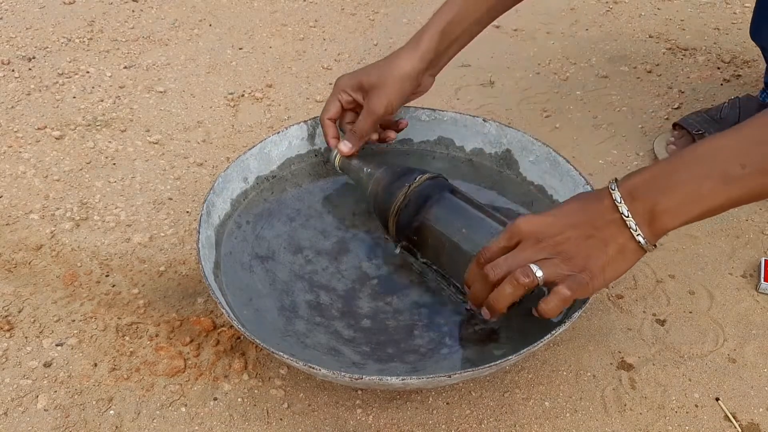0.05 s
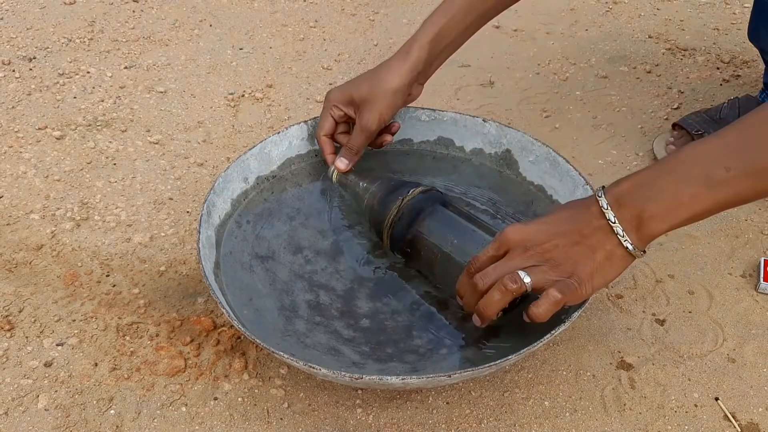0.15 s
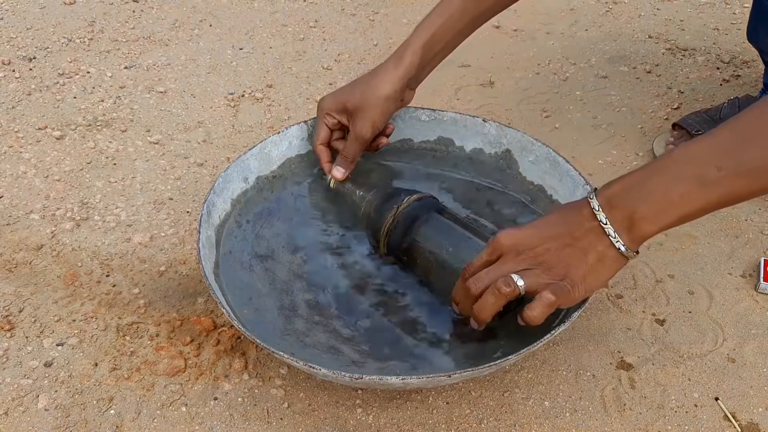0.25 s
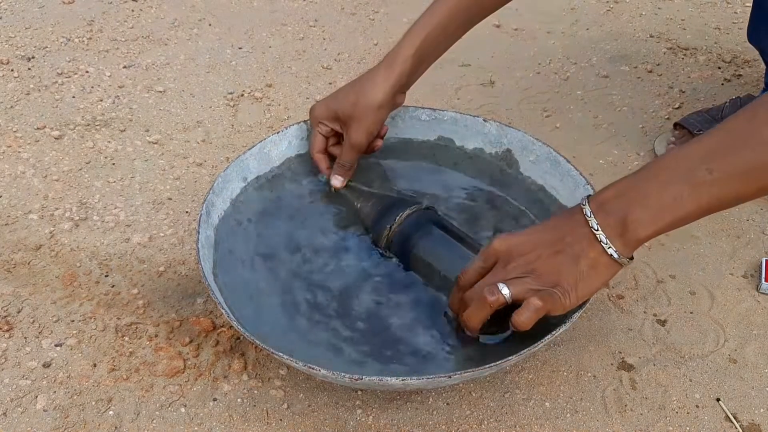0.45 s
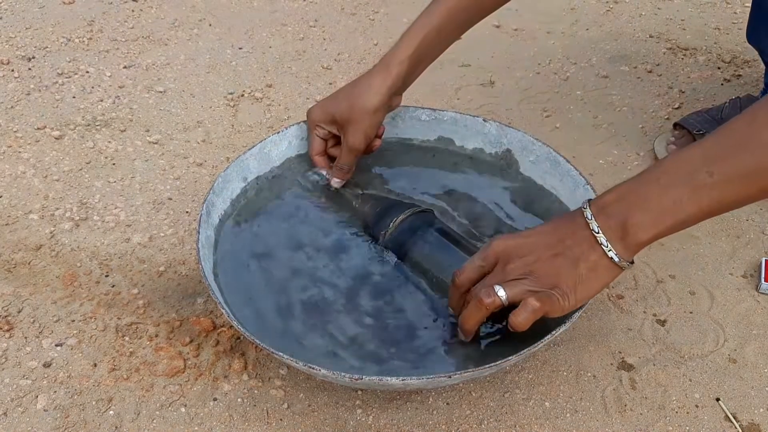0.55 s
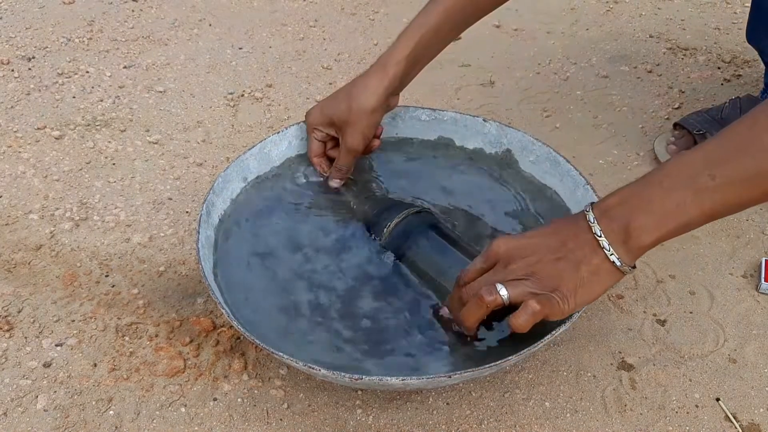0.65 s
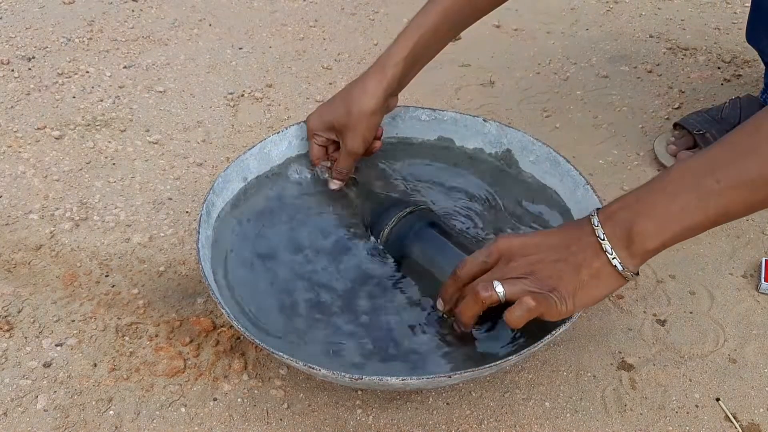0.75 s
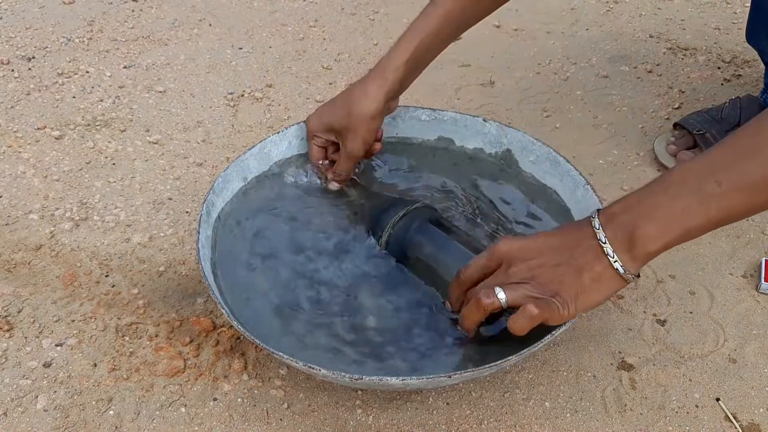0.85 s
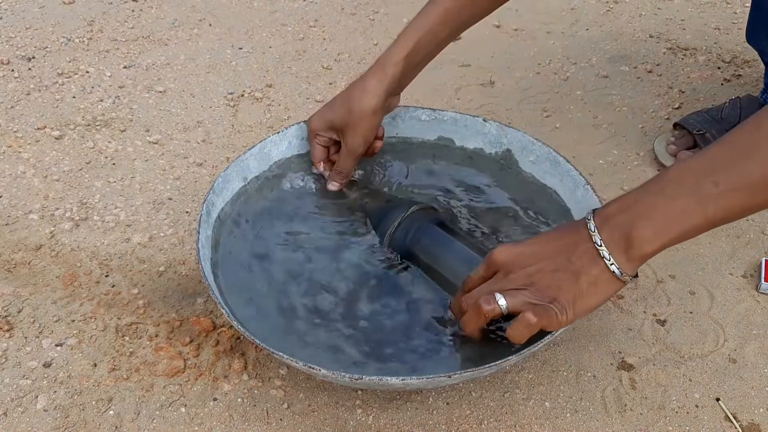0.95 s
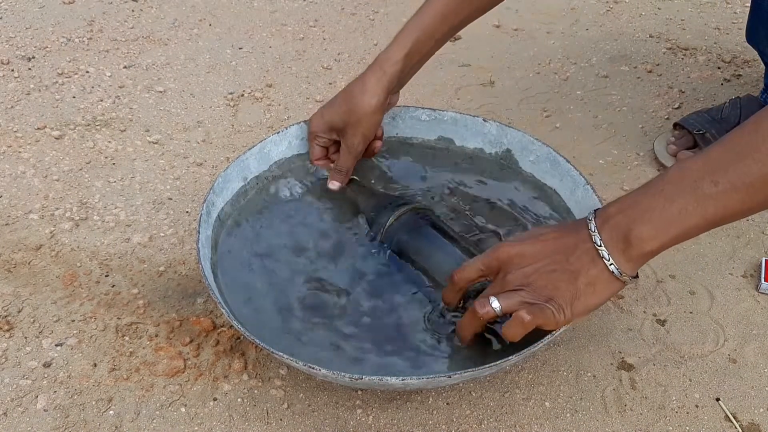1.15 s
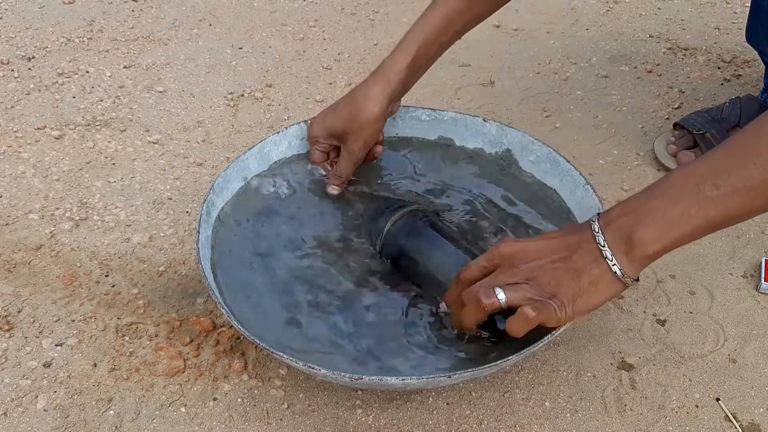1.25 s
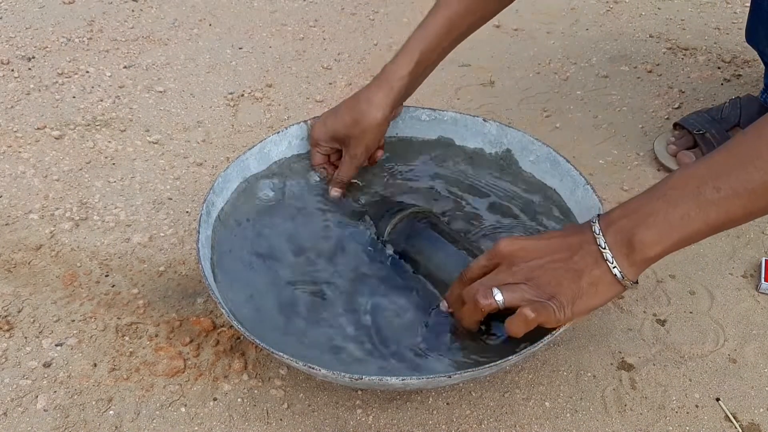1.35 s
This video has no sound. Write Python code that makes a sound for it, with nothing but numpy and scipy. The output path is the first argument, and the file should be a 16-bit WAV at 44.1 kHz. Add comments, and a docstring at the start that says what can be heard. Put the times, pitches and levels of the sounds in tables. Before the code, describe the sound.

Glass cracks with two sharp, ringing snaps as a bottle dips into water outdoors, then splits with a gulp. Small glassy ticks, splashes and bubbles follow over a faint sizzle, with low wind rumble on the microphone.

```python
"""Outdoors, at a metal basin of water. A heated glass bottle is lowered in; thermal stress cracks it
twice, then splits it, and each fracture rings the modes of the wall. Trapped air resonates in a gulp.
Water runs in with splashes, ringing bubbles and a sizzling wash, the broken edges tick, and the
bottle's cavity sings faintly. A breeze buffets the microphone, mostly its right port."""
import sys
import numpy as np
from scipy import signal
from scipy.fft import rfft, irfft, next_fast_len
from scipy.io import wavfile
from scipy.ndimage import map_coordinates

SR = 44100
rng = np.random.default_rng(int(sys.argv[2]) if len(sys.argv) > 2 else 0)


def wav_record(signal):
    """Record a signal, one row per channel, as 16-bit PCM in the file named by sys.argv[1]."""
    frames = np.transpose(np.atleast_2d(signal))
    bounded = np.clip(frames, -1, 1)
    # unit amplitude maps onto the largest positive 16-bit level
    quanta = np.round(bounded * 32767).astype(np.int16)
    wavfile.write(sys.argv[1], SR, quanta)


N = 61739

# fractures: start_s, ring_db, ring_time_share, snap_db, snap_t60_s, left_minus_right_db, thud_db
CRACKS = [(.2142, -13.5, 0.52, -19.5, 0.016, 2.5, -63), (.3150, -20, 1, -16.5, 0.011, 4, -72),
          (.5179, -10, 1, -21, 0.0044, 0, -18)]
# spectrum of a small glass impact: frequency_hz, level_db
TICK_SPECTRUM = [(600, -12.5), (1500, -1.5), (4500, 3.5), (6500, 0), (8500, -13), (11500, -4),
                 (16000, -13.5)]


def amp(db):
    """Decibels to amplitude ratio."""
    return 10 ** (np.asarray(db) / 20)


def unit(x):
    """Normalisation to rms 1."""
    return x / np.sqrt(np.mean(x ** 2) + 1e-20)


def along(points, hz):
    """Interpolation of (frequency_hz, value) points on a logarithmic frequency axis."""
    frequencies, values = np.transpose(points)
    return np.interp(np.log(hz + 1), np.log(frequencies + 1), values)


def level(points):
    """Amplitude envelope through (time_s, level_db) points."""
    return amp(np.interp(np.arange(N) / SR, *np.transpose(points)))


def since(start_s):
    """Seconds elapsed since an onset, zero before it."""
    return np.maximum(np.arange(N) / SR - start_s, 0)


def fade(t, rise_s, t60_s):
    """Damped envelope: a quick rise, then exponential decay."""
    return (1 - np.exp(-t / rise_s)) * amp(-60 * t / t60_s)


def swell(centre_s, half_s):
    """Gaussian envelope, down to 1/e at half_s from its centre."""
    return np.exp(-((np.arange(N) / SR - centre_s) / half_s) ** 2)


def wobble(rate_hz):
    """Smooth random modulation with rate_hz knots a second."""
    return map_coordinates(rng.standard_normal(1024), [np.arange(N) * rate_hz / SR], mode="wrap")


def filtered(x, response):
    """Linear filtering: the spectrum of x times a frequency response."""
    size = next_fast_len(N + SR // 2)
    return irfft(rfft(x, size) * response(np.fft.rfftfreq(size, 1 / SR)), size)[..., :N]


def coloured(x, spectrum):
    """Spectral shaping by (frequency_hz, level_db) points, at rms 1."""
    return unit(filtered(x, lambda hz: amp(along(spectrum, hz))))


def spread(pair, correlation):
    """Mid-side mixing gives two independent signals a left-right correlation."""
    angle = np.arccos(correlation) / 2
    mid, side = np.cos(angle) * pair[0], np.sin(angle) * pair[1]
    return np.array([mid + side, mid - side])


def hiss(spectrum, correlation):
    """Coloured Gaussian noise in stereo."""
    return spread(coloured(rng.standard_normal((2, N)), spectrum), correlation)


def fizz(spectrum, correlation, rate_hz=2500, scatter_db=3.5, pop_share=0.64):
    """Shot noise: dense tiny pops of uneven size on a Gaussian bed."""
    pops = (rng.random((2, N)) < rate_hz / SR) * rng.standard_normal((2, N))
    pops *= amp(scatter_db * rng.standard_normal((2, N)))
    bed = np.sqrt(1 - pop_share) * rng.standard_normal((2, N))
    return spread(coloured(np.sqrt(pop_share) * unit(pops) + bed, spectrum), correlation)


def echo(x, t60_s):
    """Diffuse reverberation: convolution with decaying noise, different in each channel."""
    tail = rng.standard_normal((2, N)) * fade(since(0), .001, t60_s)
    return signal.fftconvolve(x, tail / np.linalg.norm(tail[0]), axes=1)[:, :N]


def still_air():
    """Ambient noise floor: faint, steady and strongest at low frequencies."""
    # outdoor air: frequency_hz, level_db
    spectrum = [(400, 0), (1500, -20), (16000, -22)]
    return amp(-67) * hiss(spectrum, correlation=0.39)


def wind():
    """Turbulent pressure buffets each port independently; single eddies push on the right one."""
    # buffeting at each port: time_s, level_db
    left_port = [(.74, -58), (.81, -36.5), (.86, -46.5), (1.4, -63)]
    right_port = [(.08, -54), (.17, -35.5), (.35, -46), (.6, -34.5), (.8, -39.5), (1.1, -37.5),
                  (1.4, -44.5)]
    # turbulence: frequency_hz, level_db
    spectrum = [(20, -37), (45, -7.5), (80, 1.5), (140, -1), (220, -10.5), (330, -23.5), (2000, -94)]
    # eddy strikes: time_s, peak_db
    eddies = [(0.164, -22), (0.244, -23), (.29, -24.5), (0.384, -30), (0.424, -27.5), (0.48, -23.5),
              (0.598, -23), (0.628, -23), (0.692, -25), (0.732, -21), (0.936, -20.5), (1.054, -20.5),
              (1.301, -25.5)]
    left = level(left_port) * coloured(rng.standard_normal(N), spectrum)
    right = level(right_port) * coloured(rng.standard_normal(N), spectrum)
    for time_s, peak_db in eddies:
        push = unit(signal.unit_impulse(N, round(time_s * SR)))
        turbulence = unit(swell(time_s, half_s=0.01) * rng.standard_normal(N))
        eddy = coloured(turbulence - push, spectrum)
        right += amp(peak_db) * eddy / np.abs(eddy).max()
    return np.array([left, right])


def hollow():
    """Cavity resonance: narrow noise bands of the bottle's air swell and glide as it dips and fills."""
    # air modes: centre_s, half_length_s, pitch_hz, level_db, width_hz, glide_hz_per_s
    resonances = [(0.35, 0.11, 1930, -43.5, 190, -900), (0.455, 0.057, 1815, -42, 90, 0),
                  (0.432, 0.1, 875, -48.5, 150, 200), (0.66, 0.12, 2005, -40.5, 35, -2),
                  (1.02, .085, 1815, -40, 70, -400), (1.236, 0.026, 1002, -45, 20, 0)]
    t, tones = np.arange(N) / SR, np.zeros(N)
    for centre_s, half_s, hz, db, width_hz, glide in resonances:
        phase = 2 * np.pi * (hz * t + glide * (t - centre_s) ** 2 / 2)
        band = unit(wobble(width_hz) * np.sin(phase) + wobble(width_hz) * np.cos(phase))
        tones += amp(db) * swell(centre_s, half_s) * band / np.sqrt(2)
    first_crack_s = CRACKS[0][0]
    return tones * (t > first_crack_s) / np.sqrt(2)


def water():
    """Incoherent sources add in power: a sizzling wash, splashes, their spray and a lower churning."""
    # splashes: start_s, level_db, t60_s, spray_db
    splashes = [(0.522, -28, 0.2, -55), (0.5977, -24.5, 0.06, -48), (0.669, -26.5, 0.15, -24),
                (0.706, -29, 0.046, -52), (0.9026, -52, 0.053, -23.5), (0.946, -26, 0.055, -58),
                (1.041, -28.5, 0.066, -29.5), (1.096, -34.5, 0.08, -25), (1.193, -37, 0.08, -62)]
    # envelopes of the flow: time_s, level_db
    wash_levels = [(.21, -59.5), (.22, -47), (.55, -45.5), (.72, -43), (.8, -45), (.95, -39.5), (1.02, -47),
                   (1.25, -45), (1.4, -47)]
    churn_levels = [(.21, -101), (.22, -51), (.51, -42.5), (.55, -33), (.68, -44), (.8, -50), (.89, -46.5),
                    (.96, -41), (1.1, -39.5), (1.27, -49.5)]
    # spectra of the flow: frequency_hz, level_db
    wash_spectrum = [(450, -9), (1100, -8), (2000, -12.5), (2700, -4), (4300, 2), (6500, -3), (8600, -17),
                     (11500, -9), (15500, -10)]
    spray_spectrum = [(1500, -4), (6000, 3.5), (9000, -8), (12000, 3)]
    churn_spectrum = [(400, -29), (750, -14), (1150, 0), (1450, -2), (1750, 2), (2150, -1.5), (2600, -13),
                      (4000, -26)]
    splash_gain, spray_gain = np.zeros((2, N))
    for start_s, db, t60_s, spray_db in splashes:
        splash_gain += amp(db) * fade(since(start_s), rise_s=0.00027, t60_s=t60_s)
        spray_gain += amp(spray_db) * fade(since(start_s), rise_s=0.00017, t60_s=0.036)
    wash = np.hypot(level(wash_levels), splash_gain) * fizz(wash_spectrum, correlation=0.39)
    spray = spray_gain * fizz(spray_spectrum, correlation=0.39)
    churn = level(churn_levels) * fizz(churn_spectrum, correlation=0.36)
    return wash + spray + churn


def bubbles(jitter_rad=0.64, glide_per_t60=0.063):
    """Each bubble is a damped oscillator, unsteady in the moving water and rising a little in pitch."""
    # bubble pulsations: start_s, pitch_hz, level_db, t60_s
    pulsations = [(0.6, 1047, -24, 0.08), (0.678, 1164, -23, 0.045), (0.753, 398, -35.5, 0.03),
                  (0.907, 1280, -31.5, 0.044), (0.95, 1270, -19, 0.018), (0.955, 1088, -29.5, 0.077),
                  (1.006, 926, -28.5, 0.027), (1.043, 1036, -22, 0.058), (1.096, 1004, -28.5, 0.032),
                  (1.194, 1106, -35.5, 0.056), (1.3079, 2515, -15, 0.011)]
    out = np.zeros(N)
    for start_s, hz, db, t60_s in pulsations:
        t = since(start_s)
        phase = 2 * np.pi * hz * t * (1 + glide_per_t60 * t / t60_s / 2)
        phase += jitter_rad * wobble(rate_hz=195.6)
        out += amp(db) * fade(t, rise_s=0.0005, t60_s=t60_s) * np.sin(phase)
    return out


def crackle(rate_hz=170):
    """Specks of glass settle as sparse random impulses, loudest a little after the split."""
    specks = (rng.random(N) < rate_hz / SR) * rng.standard_normal(N)
    return amp(-44.5) * swell(centre_s=0.7, half_s=0.09) * coloured(specks, TICK_SPECTRUM)


def ticks(grit=0.55):
    """Brief contact is broadband: the broken edges give a sharp pulse, then a trace of scraping."""
    # edge contacts: start_s, peak_db
    contacts = [(.3857, -24), (.5864, -14), (.5972, -13), (.6084, -9), (.6091, -11), (.623, -15),
                (.6389, -15.5), (.6631, -17.5), (.6756, -12), (.6912, -5.5), (.6994, -15), (.7068, -17),
                (.7375, -13), (.7502, -12.5), (.7655, -22), (.8181, -10.5), (.8584, -19), (.8712, -21),
                (.8788, -17.5)]
    out = np.zeros((2, N))
    for start_s, peak_db in contacts:
        scrape = grit * fade(since(start_s), rise_s=1 / SR, t60_s=0.0019) * rng.standard_normal((2, N))
        pulse = signal.unit_impulse(N, round(start_s * SR))
        tick = coloured(scrape - pulse, TICK_SPECTRUM)
        out += amp(peak_db) * tick / np.abs(tick).max()
    return out


def gulp(start_s=.5183, jitter_rad=.3):
    """Water bursts through the split; the trapped air acts as a spring and rings unsteadily."""
    # trapped-air modes: pitch_hz, relative_db, t60_s
    modes = [(765, -13, 0.071), (1056, 2, 0.065), (1141, 1, 0.099), (1306, 3, 0.063), (1414, -13, 0.17),
             (1642, -14, 0.12), (1747, -14, 0.14), (2235, -24, 0.26)]
    t, out = since(start_s), np.zeros(N)
    for hz, db, t60_s in modes:
        phase = 2 * np.pi * hz * t + jitter_rad * wobble(rate_hz=195.6)
        out += amp(db) * fade(t, rise_s=0.0034, t60_s=t60_s) * np.sin(phase)
    return amp(-9.5) * out


def driven(start_s, t60_s, rise_s=0.00059, run_s=0.0012):
    """Forced, then free vibration: the envelope builds while a crack runs and decays once it stops."""
    return (1 - np.exp(-since(start_s) / rise_s)) * amp(-60 * since(start_s + run_s) / t60_s)


def cracks(jitter_rad=.5):
    """Fracture releases thermal stress as a snap and a thud, and excites the water-damped wall modes."""
    # wall modes: pitch_hz, t60_s, first_crack_db, second_crack_db, third_crack_db
    wall_modes = [(1214, 0.14, -30.5, -25.5, -27), (2148, 0.26, -28, -27, -26),
                  (3734, 0.037, -15, -3, -9.5), (4157, 0.03, -2.5, -32, -3), (4340, 0.0073, 1, 6, -17),
                  (5160, 0.016, -4.5, -18, -6.5), (6490, 0.048, -13, -1.5, -30),
                  (6815, 0.0052, -0.5, -5.5, 3.5), (10900, 0.011, -6.5, -2.5, -38)]
    # spectra of the fracture noise: frequency_hz, level_db
    snap_spectrum = [(300, -40), (1000, -39), (2200, 2), (3000, -28), (4200, 0.5), (7000, 2), (8800, -10),
                     (10800, 3), (15000, -1.5)]
    thud_spectrum = [(60, -4), (150, -10), (500, 1.5), (1200, 1.5), (3000, -5), (8000, -15.5)]
    out = np.zeros((2, N))
    for k, (start_s, ring_db, time_share, snap_db, snap_t60_s, pan_db, thud_db) in enumerate(CRACKS):
        ring = np.zeros((2, N))
        for hz, t60_s, *drive_db in wall_modes:
            # water loading makes the phase unsteady
            jitter = jitter_rad * np.array([wobble(rate_hz=400), wobble(rate_hz=400)])
            phase = 2 * np.pi * hz * since(start_s) + jitter
            ring += amp(drive_db[k]) * driven(start_s, t60_s * time_share) * np.sin(phase)
        snap = driven(start_s, snap_t60_s, rise_s=0.00017) * hiss(snap_spectrum, correlation=0.55)
        thud = driven(start_s, t60_s=0.0097) * hiss(thud_spectrum, correlation=0.96)
        pan = amp([[pan_db / 2], [-pan_db / 2]])
        out += pan * (amp(ring_db) * ring + amp(snap_db) * snap + amp(thud_db) * thud)
    return out


def scene(yard_cutoff_hz=5070, right_lag_s=.00003):
    """Superposition: glass and water, their reflections from basin and yard, the breeze and the air."""
    # level difference between the channels: frequency_hz, left_minus_right_db
    balance = [(700, -0.5), (2400, -1.5), (4400, -3.5), (8000, 3.5), (15000, 2)]
    bright = cracks() + ticks() + crackle() + water()
    basin = amp(-13) * echo(bright, t60_s=0.012)
    near = bright + basin + gulp() + bubbles() + hollow()
    yard = amp(-6.5) * filtered(echo(near, t60_s=0.15), lambda hz: 1 / (1 + (hz / yard_cutoff_hz) ** 2))
    sides = np.array([[.5], [-.5]])

    def direction(hz):
        """Level and time differences place the basin; its sound reaches the left channel first."""
        return amp(sides * along(balance, hz)) * np.exp(2j * np.pi * hz * sides * right_lag_s)

    return filtered(near + yard, direction) + wind() + still_air()


def record(dry, cutoff_hz=16000):
    """Band limiting: a steep low-pass removes the highest treble."""
    return filtered(dry, lambda hz: 1 / np.sqrt(1 + (hz / cutoff_hz) ** 120))


dry = scene()
out = record(dry)
wav_record(out)
```